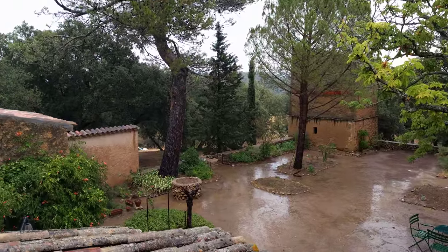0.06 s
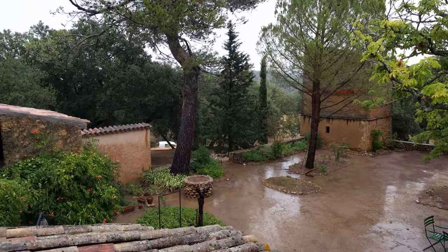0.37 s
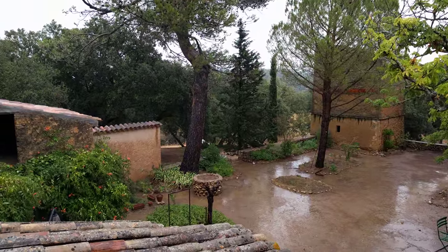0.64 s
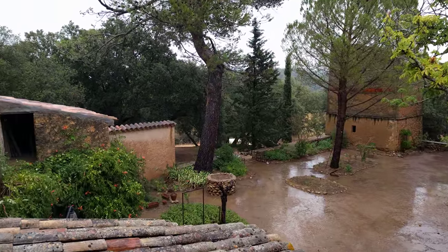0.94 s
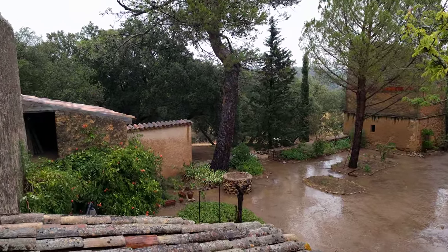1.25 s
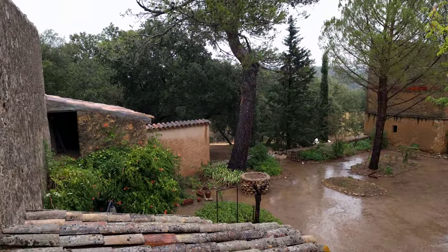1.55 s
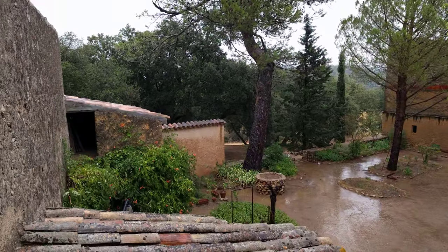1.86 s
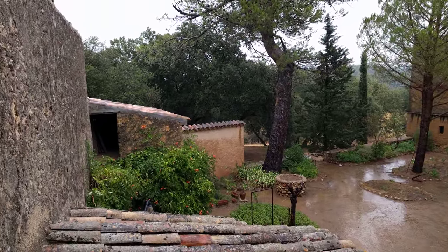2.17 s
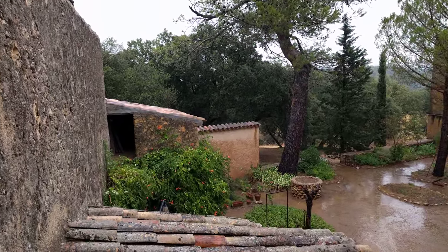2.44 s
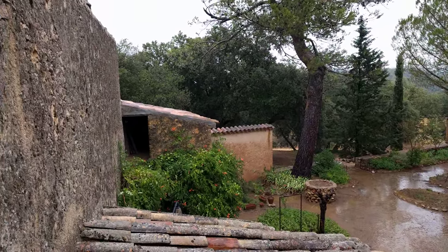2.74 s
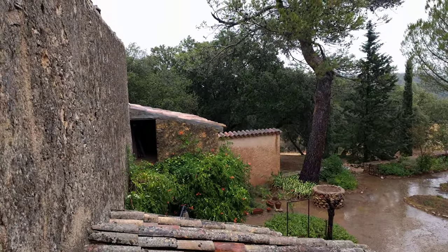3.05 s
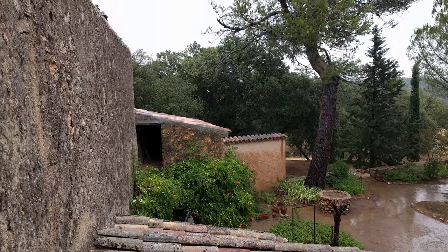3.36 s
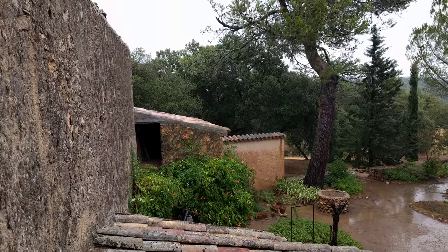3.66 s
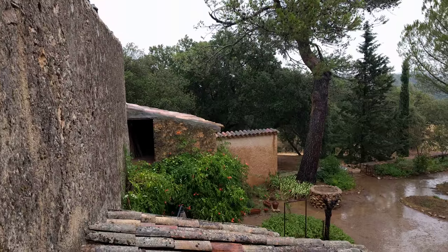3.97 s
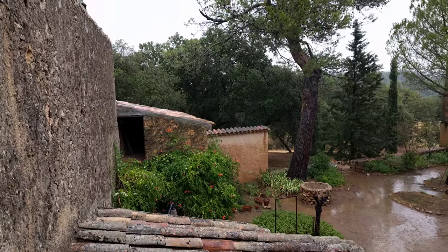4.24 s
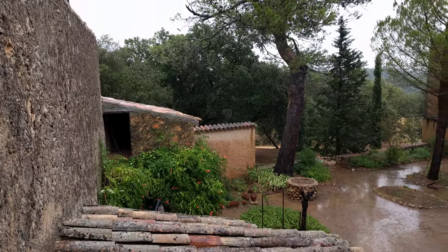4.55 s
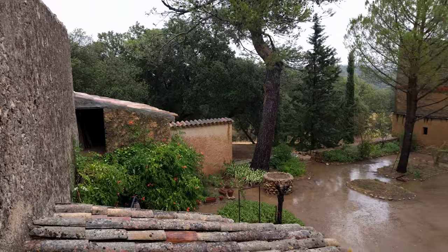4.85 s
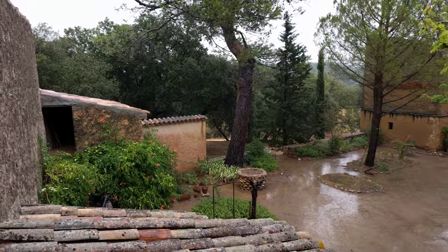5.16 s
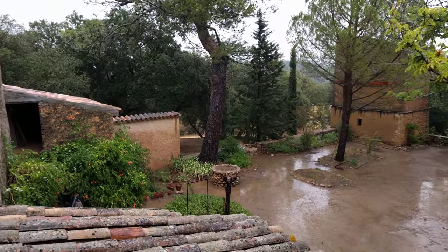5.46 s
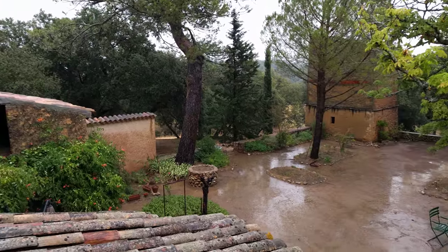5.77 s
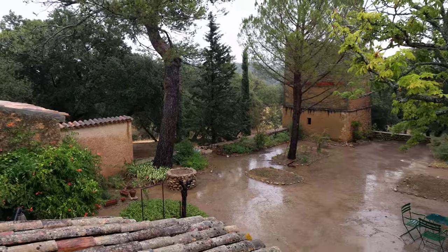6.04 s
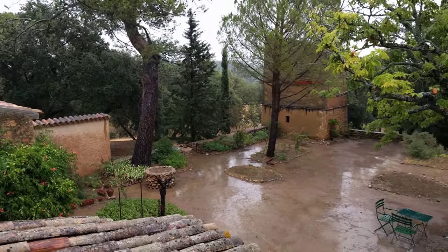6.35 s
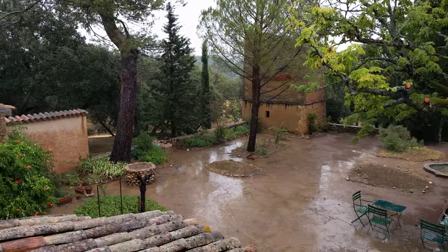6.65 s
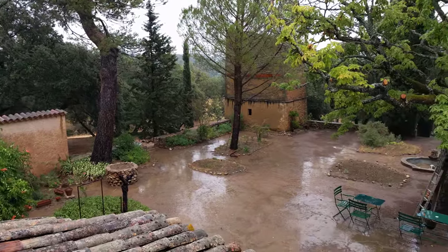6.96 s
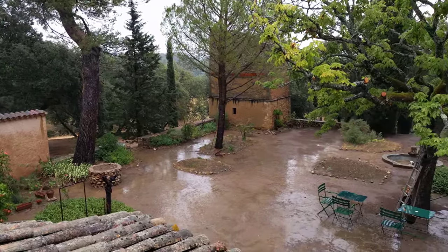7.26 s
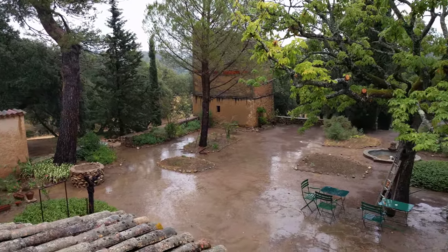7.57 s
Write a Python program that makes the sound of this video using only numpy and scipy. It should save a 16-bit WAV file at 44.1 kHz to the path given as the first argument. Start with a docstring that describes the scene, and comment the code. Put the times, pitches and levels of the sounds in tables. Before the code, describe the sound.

Steady rain patters on a courtyard, with single close drops smacking on roof tiles and leaves over a faint low drone.

```python
"""Steady rain in a walled courtyard, heard from a phone held over a tiled roof, its microphone port
ringing near 7 kHz. From the start, countless far drops merge into a wash, nearer ones patter, and
something drones low in the distance. From 0.6 s single drops splat on leaves and smack on the tiles;
between 2.8 and 5 s four tap the phone itself. Splashing swells as the phone turns to face the open
yard at 6.7 s, and just after 7 s a gust brushes the microphone."""
import sys
import numpy as np
from scipy import signal
from scipy.fft import rfft, irfft, next_fast_len
from scipy.io import wavfile
from scipy.ndimage import map_coordinates

SR = 44100
rng = np.random.default_rng(int(sys.argv[2]) if len(sys.argv) > 2 else 0)


def generate_wav(sig):
    """Save sig (samples, or channels by samples) to the path in sys.argv[1] as 16-bit PCM at SR."""
    pcm = np.round(np.clip(np.atleast_2d(sig).T, -1, 1) * 32767).astype(np.int16)
    wavfile.write(sys.argv[1], SR, pcm)


N = 335601
TIME = np.arange(N) / SR
TOP_HZ = 17100

# strength of the rain: (time [s], relative level of far wash [dB], relative level of near patter [dB])
RAIN = [(0, -53, -38), (0.6, -54.5, -38.5), (2.7, -54, -40.5), (3.7, -53, -40), (4.8, -52.5, -43),
        (5.6, -52.5, -39), (6.6, -54.5, -42), (7.6, -55.5, -42)]


def undb(db):
    """Amplitude ratio: tenfold for every 20 dB."""
    return 10 ** (np.asarray(db) / 20)


def curve(table, column=1):
    """Gain envelope, interpolated linearly in decibels over time."""
    rows = np.array(table)
    return undb(np.interp(TIME, rows[:, 0], rows[:, column]))


def unit(x):
    """Normalisation to unit mean power."""
    return x / np.sqrt(np.mean(x ** 2))


def with_energy(x, db):
    """Normalisation of a transient to a total energy, the sum of its squares."""
    return x * undb(db) / np.sqrt(np.sum(x ** 2))


def colour(x, points):
    """Minimum-phase filter through (frequency [Hz], gain [dB]) points."""
    hz, db = np.transpose(points)
    size = next_fast_len(len(x) + 8192, True)
    freqs = np.maximum(np.arange(size // 2 + 1) * SR / size, 1)
    gain = undb(np.interp(np.log(freqs), np.log(hz), db))
    cepstrum = irfft(np.log(gain), size)
    cepstrum[1:size // 2] *= 2  # folding onto positive time makes the filter causal
    cepstrum[size // 2 + 1:] = 0
    return irfft(rfft(x, size) * np.exp(rfft(cepstrum)), size)[:len(x)]


def band(x, hz, q):
    """Second-order resonator of quality factor q, with unit gain at its centre."""
    w = 2 * np.pi * min(hz, TOP_HZ) / SR
    a = np.sin(w) / (2 * q)
    return signal.lfilter([a, 0, -a], [1 + a, -2 * np.cos(w), 1 - a], x)


def walk(per_s):
    """Slow random modulation: a spline through Gaussian values, with a spread near 1."""
    knots = rng.standard_normal(1024)
    return map_coordinates(knots, [TIME * per_s], order=3, mode="wrap")


def shower(per_s, spread_db, cap_db):
    """Poisson process of impacts, most of them small; the nearest possible drop sets the cap."""
    falls = rng.random(N) < per_s / SR
    size = undb(np.minimum(spread_db * rng.exponential(size=N), cap_db))
    return falls * size * np.sign(rng.standard_normal(N))


def spray(decay_s, rise_s):
    """Droplets thrown off by an impact: grainy noise with an exponential decay."""
    t = TIME[:4096]
    grains = rng.standard_normal(len(t)) * undb(6.4 * rng.standard_normal(len(t)))
    return grains * (1 - np.exp(-t / rise_s)) * np.exp(-t / decay_s)


def add(out, start_s, sound):
    """Superposition of a transient at its onset time."""
    i = max(int(start_s * SR), 0)
    out[i:i + len(sound)] += sound[:max(N - i, 0)]


def facing_yard(faced_s=6.74, turn_s=1):
    """Orientation: how squarely the phone faces the open yard, 0 to 1, a Gaussian in time."""
    return np.exp(-((TIME - faced_s) / turn_s) ** 2)


def far_wash(flicker_db=0.85, wall_delay_s=0.0033, wall_gain=0.05):
    """Far impacts on trees and ground sum incoherently into noise, which the house wall reflects."""
    # spectrum of far rain: (frequency [Hz], gain [dB])
    spectrum = [(60, -18), (270, -1.5), (550, 0), (900, 0), (1300, -0.5), (1700, 0.44), (2600, -4.5),
                (4200, -1), (5200, -2.5), (7200, -1.5), (9000, -5), (11000, -6), (16000, -7.5)]
    direct = 0
    for hz in 250 * 2. ** np.arange(7):
        impacts = unit(shower(5000, 2.45, 15.6)) + rng.standard_normal(N)
        edges = [hz / np.sqrt(2) if hz > 250 else 60, min(hz * np.sqrt(2), 20000)]
        octave = signal.sosfilt(signal.butter(3, edges, "bandpass", fs=SR, output="sos"), impacts)
        # fine spray is made of many more droplets, so the treble wavers less
        direct = direct + octave * undb(flicker_db * min(1, 2500 / hz) * walk(11))
    echo = np.interp(TIME - wall_delay_s, TIME, direct)
    return unit(colour(direct + wall_gain * echo, spectrum)) * curve(RAIN, column=1) * undb(7.0)


def patter(clump_db=1.5, facing_db=-0.5):
    """Shot noise of drops on leaves: ticks and spray that recede slightly as the phone faces the yard."""
    # spectrum of near rain: (frequency [Hz], gain [dB])
    spectrum = [(300, -28.5), (1200, -6.5), (2700, -4.5), (3300, -2), (4300, -5), (5000, 4), (6200, -3.5),
                (7200, -3.5), (9000, -0.5), (11000, -9), (16000, -11)]
    ticks = unit(shower(1600, 2.05, 11.0))
    decay = np.exp(-1 / (0.0069 * SR))
    spray_power = signal.lfilter([1], [1, -decay], shower(110, 2.6, 9.8) ** 2)
    bursts = np.sqrt(spray_power) * rng.standard_normal(N)
    drops = (ticks + undb(-1.0) * unit(bursts)) * undb(clump_db * walk(20))
    return unit(colour(drops, spectrum)) * curve(RAIN, column=2) * undb(-8.0 + facing_db * facing_yard())


def puddles(away_db=-63.5, facing_db=11):
    """Shot noise of drops slapping the wet open ground, louder as the phone faces it."""
    # spectrum of the slaps: (frequency [Hz], gain [dB])
    spectrum = [(400, -27), (1200, -23), (2000, 1), (3200, 4.5), (4500, -18), (7200, -23), (10000, 3),
                (16000, -5)]
    slaps = unit(shower(2500, 6.2, 15))
    return unit(colour(slaps, spectrum)) * undb(away_db + facing_db * facing_yard())


def plips():
    """Sparse impacts excite damped resonances: dull knocks on the tiles, sharp ticks close by."""
    knocks = sum(band(shower(11, 6.6, 8.7), hz, q=3.0) for hz in np.geomspace(800, 2400, 6))
    ticks = band(shower(39, 2.8, 7.4), 11400, q=1.3)
    return undb(-65.0) * unit(knocks) + undb(-69) * unit(ticks)


def small_drips(per_s=6, energy_db=-26, spread_db=4.0, low_hz=7500, high_hz=14000):
    """Light drips fall at random from eaves and branches, each a band-limited impulse with spray."""
    out, blow = np.zeros(N), signal.unit_impulse(4096)
    for when, pitch, size in rng.random((int(per_s * N / SR), 3)):
        drip = blow + with_energy(spray(0.006, .002), 0)
        hz = low_hz * (high_hz / low_hz) ** pitch
        db = energy_db + spread_db * (2 * size - 1)
        add(out, when * N / SR, with_energy(band(drip, hz, q=1.7), db))
    return out


def drone(hz=47.96, waver=0.0453):
    """A distant tone and its second harmonic, randomly modulated in frequency and amplitude."""
    # strength of the drone: (time [s], relative level [dB])
    levels = [(0, -48), (0.2, -47), (0.38, -52.5), (0.85, -45), (1.45, -49.5), (2.0, -53.5), (3.25, -49),
              (3.67, -61), (4.6, -50.5), (5.9, -52.5), (6.6, -61.5)]
    phase = 2 * np.pi * np.cumsum(hz * (1 + waver * walk(7))) / SR
    tone = (np.sin(phase) + 0.18 * np.sin(2 * phase)) * undb(2.2 * walk(12))
    return undb(-3.0) * unit(tone) * curve(levels)


def rumble():
    """Low-frequency noise around the drone, slowly modulated in amplitude."""
    # spectrum of the rumble: (frequency [Hz], gain [dB])
    spectrum = [(30, -31), (48, -3), (68, 5), (82, 0), (98, 3), (112, -2.5), (130, -11), (250, -25)]
    # strength of the rumble: (time [s], relative level [dB])
    levels = [(0, -48), (0.7, -50.5), (1.85, -48.5), (2.05, -57), (2.9, -52.5), (3.8, -59), (4.2, -53),
              (5.3, -56), (6.4, -62.5), (6.9, -59.5)]
    return undb(0.5) * unit(colour(rng.standard_normal(N), spectrum)) * curve(levels)


def yard_resonance(level_db=-61.5, growth=3.2):
    """The yard's hollow resonance, driven by noise, swells as a power law of the far wash."""
    # response of the yard: (frequency [Hz], gain [dB])
    response = [(90, -28), (135, -1), (160, 0.5), (200, 0), (228, -30), (255, -7.5), (300, -21.5),
                (600, -29)]
    hollow = unit(colour(rng.standard_normal(N), response))
    return undb(level_db) * hollow * unit(curve(RAIN)) ** growth


def splats():
    """Fat drips break up on impact, spreading their energy over a short, soft burst of noise."""
    # drips on leaves and wet ground: (time [s], energy [dB], nominal frequency [Hz])
    drips = [(0.59, -17, 7800), (0.664, -16, 6400), (1.044, -15.5, 5700), (1.599, -20, 5900),
             (1.917, -17, 4800), (3.301, -19, 6300), (4.146, -15.5, 7000), (4.732, -18.5, 6500),
             (5.233, -18, 5600), (5.35, -16.5, 5600), (5.548, -17.5, 6700), (6.074, -19, 7450),
             (6.179, -17, 6200), (6.824, -12.5, 4340), (7.191, -15, 6250), (7.407, -15, 4500)]
    out = np.zeros(N)
    for start_s, db, hz in drips:
        burst = spray(0.018, 0.0013)
        for _ in range(2):
            burst = band(burst, 0.97 * hz, q=0.81)
        add(out, start_s, with_energy(burst, db))
    return out


def tile_drops(rebound_s=.0031, rebound_db=-3, spray_db=-1.0, ring_db=-3, ring_growth=0.78):
    """Impact excitation: a drop smacks as it flattens, splashes again, sprays and rings the tile."""
    # drops on near tiles: (time [s], click energy [dB], centre [Hz], relative splash energy [dB])
    drops = [(0.5914, -22, 9200, -27), (1.1332, -14.5, 6460, -18.5), (1.2955, -20, 9300, -13.5),
             (1.4883, -9, 4380, -8), (1.5709, -24, 9600, -21.4), (1.6835, -15, 10700, -25),
             (2.5579, -21, 14100, -20), (3.2219, -20, 10000, -20), (3.508, -11.5, 7370, -9.5),
             (3.8774, -15, 8400, -13.5), (4.8564, -24, 6740, -24), (5.8842, -8.5, 5630, -13),
             (6.01, -20, 8500, -17), (6.0765, -19, 10700, -27), (6.9432, -19, 6800, -19),
             (6.9539, -18.5, 1800, -16), (7.253, -17, 7200, -27), (7.3025, -19, 10200, -22)]
    # spectrum of a smack: (multiple of the centre frequency [1], gain [dB])
    smack_shape = [(.05, -23), (.25, -37), (.5, -2), (.75, -6.5), (1.1, 3.5), (1.45, -2), (2, -8.5),
                   (3, -16)]
    out, blow = np.zeros(N), signal.unit_impulse(4096)
    heaviest_db = max(row[1] for row in drops)
    for start_s, click_db, hz, splash_db in drops:
        wet = [(hz * multiple, db) for multiple, db in smack_shape]
        smack = .5 * blow + with_energy(spray(0.00014, 0.00021), 0)
        add(out, start_s, with_energy(colour(smack, wet), click_db))
        delay_s = rebound_s * rng.uniform(1.0, 1.1)
        rebound = colour(spray(0.00028, 0.00019), wet)
        add(out, start_s + delay_s, with_energy(rebound, splash_db + rebound_db))
        droplets = colour(spray(0.018, 0.00067), wet)
        add(out, start_s, with_energy(droplets, splash_db + spray_db))
        # two tile modes, prominent only under heavy drops
        ring = band(blow, 0.69 * hz, q=51) + band(blow, 0.64 * hz, q=26)
        add(out, start_s, with_energy(ring, click_db + ring_db + ring_growth * (click_db - heaviest_db)))
    return out


def case_taps(thump_gain_db=2.0):
    """Impulse response of the phone's case to a drop: a hollow click and a heavily damped thump."""
    # drops on the case: (time [s], click energy [dB], relative thump energy [dB], click centre [Hz])
    drops = [(2.8315, -9.5, -15.5, 7360), (4.1888, -8, -16.5, 6500), (4.4922, -6, -16, 7350),
             (4.9535, -13, -17, 4800)]
    # response of the case: (frequency [Hz], gain [dB])
    response = [(100, -6), (550, -1), (1000, -2), (1700, 0.5), (2600, -3), (4300, -14.5), (6000, -7),
                (7200, -5.5), (9000, -7), (12500, -19), (14800, -2.5), (17000, -8)]
    out, blow = np.zeros(N), signal.unit_impulse(1024)
    for start_s, click_db, thump_db, hz in drops:
        click = colour(band(blow, hz, q=0.6), response)
        thump = band(blow, 155, q=0.7) + 0.32 * band(blow, 560, q=5.6)
        add(out, start_s, with_energy(click, click_db))
        add(out, start_s, with_energy(thump, thump_db + thump_gain_db))
    return out


def gust(release_s=0.14):
    """Turbulent pressure on the microphone: low noise in puffs that build, hold and die away."""
    # puffs of wind: (start [s], rise [s], hold [s], level [dB])
    puffs = [(7.047, 0.053, .02, -42), (7.27, 0.11, .12, -43.5)]
    # spectrum of the buffeting: (frequency [Hz], gain [dB])
    spectrum = [(25, -34), (50, -2), (75, -1), (140, -2.5), (200, -8), (265, -10.5), (320, -25.5),
                (700, -40)]
    envelope = np.zeros(N)
    for start_s, rise_s, hold_s, db in puffs:
        age = TIME - start_s
        release = np.exp(-np.maximum(age - rise_s - hold_s, 0) / release_s)
        envelope += undb(db) * np.clip(age / rise_s, 0, 1) * release
    return unit(colour(rng.standard_normal(N), spectrum)) * envelope


def scene():
    """Linear superposition of the rain and the low sounds, in one channel."""
    steady_rain = far_wash() + patter() + puddles() + plips() + small_drips()
    close_drops = tile_drops() + splats() + case_taps()
    return (steady_rain + close_drops + drone() + rumble() + yard_resonance() + gust())[None]


def record(dry):
    """Resonance of the microphone port lifts the treble near 7 kHz; a steep low-pass cuts the top."""
    # response of the port: (frequency [Hz], gain [dB])
    response = [(20, 3), (3000, -0.5), (5000, -0.5), (6300, 6), (7250, 12.5), (8000, 7), (9200, -5),
                (17000, -7.5)]
    low_pass = signal.ellip(10, .2, 70, TOP_HZ, fs=SR, output="sos")
    return signal.sosfilt(low_pass, colour(dry[0], response))[None]


dry = scene()
out = record(dry)
generate_wav(out)
```